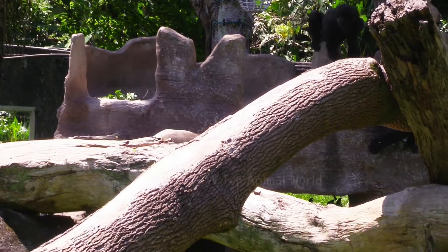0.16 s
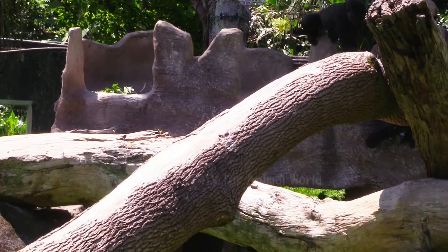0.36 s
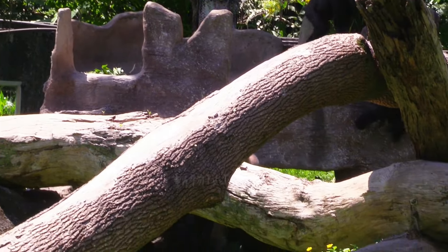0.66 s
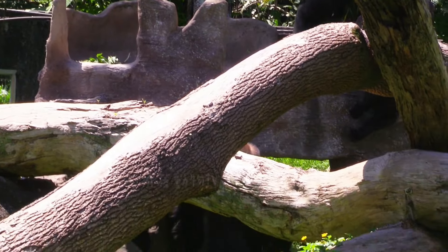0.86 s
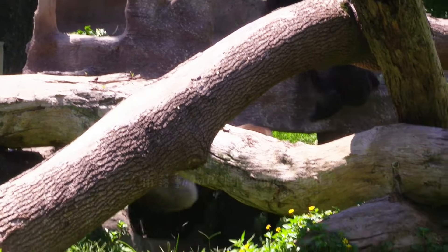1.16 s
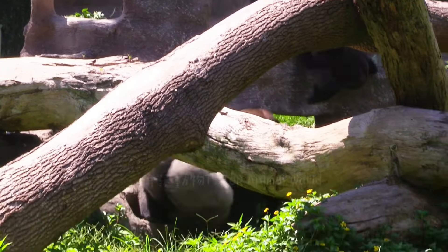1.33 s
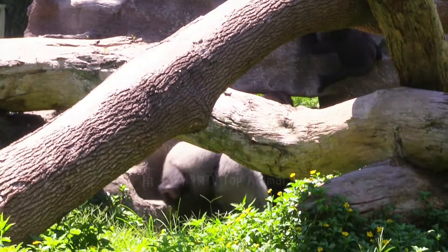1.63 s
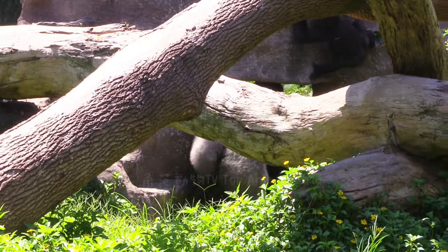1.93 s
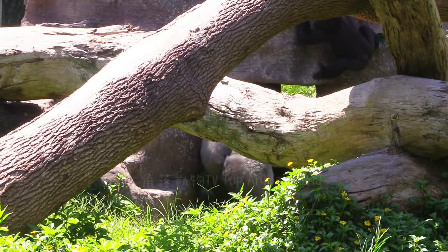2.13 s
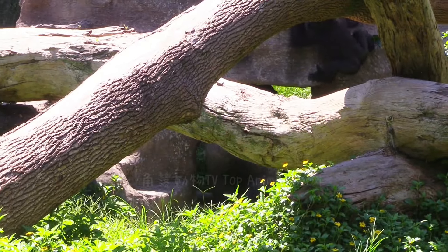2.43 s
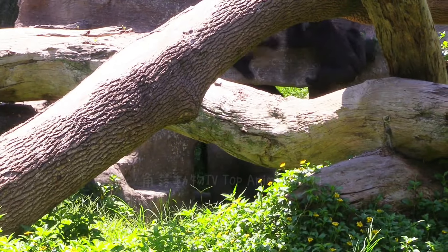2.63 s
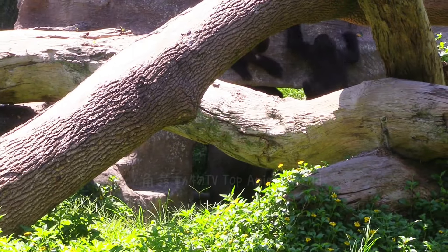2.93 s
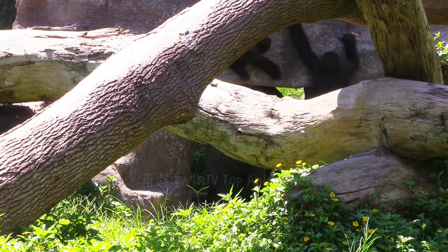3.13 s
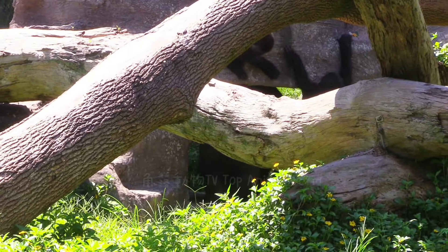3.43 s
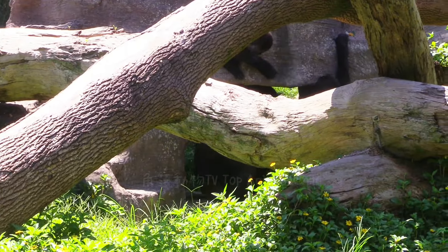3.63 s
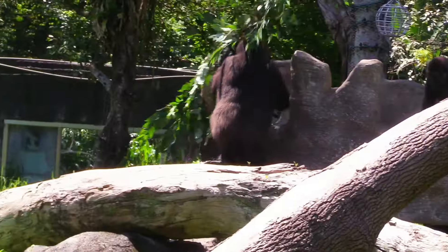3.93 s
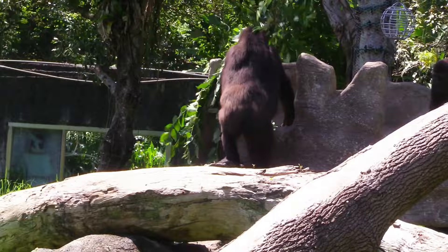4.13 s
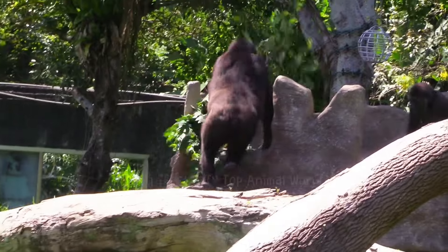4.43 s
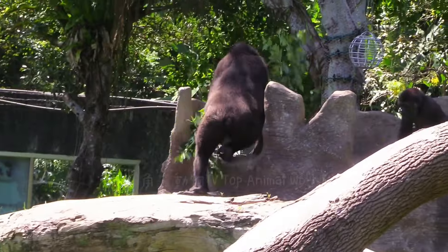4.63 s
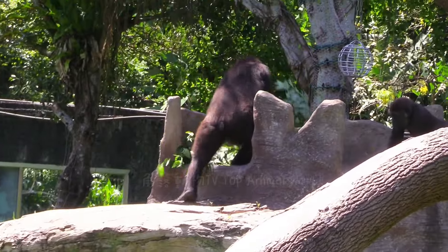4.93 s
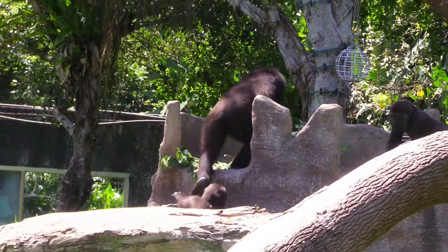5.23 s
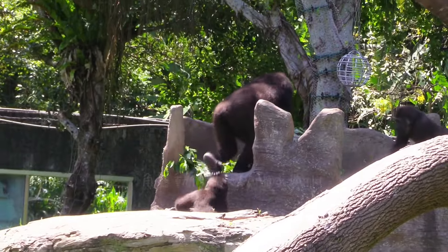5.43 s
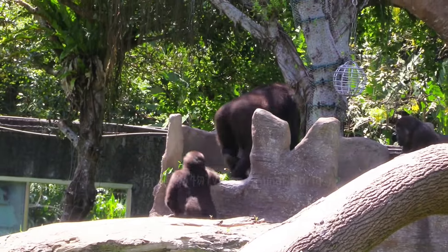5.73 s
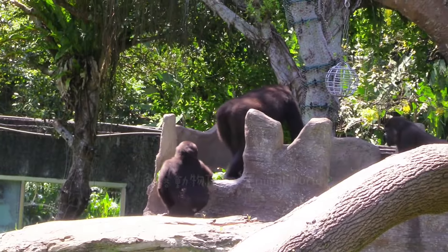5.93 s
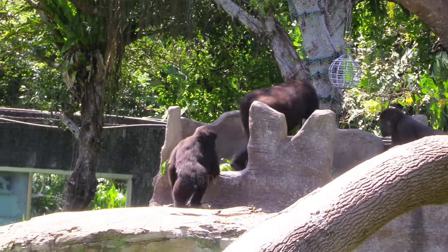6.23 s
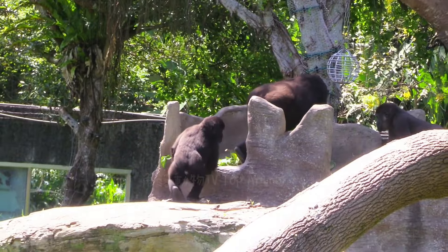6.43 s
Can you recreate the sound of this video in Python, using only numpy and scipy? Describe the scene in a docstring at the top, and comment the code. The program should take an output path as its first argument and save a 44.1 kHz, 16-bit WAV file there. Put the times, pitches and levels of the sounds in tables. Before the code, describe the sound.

Steady, quiet distant town noise and a low hum lie under birdsong outdoors. A close bird swells through rapid high loops, slurs and warbles, ending in a buzzing flourish, as a more distant bird chatters a fast even trill near the centre. A long lull holds barely audible tree chirps, then the trill returns more softly, followed by a rising sweep and two last chips. Stereo pickup with short, diffuse echoes from leaves, rocks and trees.

```python
"""Songbirds in trees round a rock-walled enclosure, over distant town noise and a steady machine hum.
After three faint falling calls comes a thin whistle; a near bird sings quick looping notes while another
bird, farther off, trills. The near bird goes on to lower phrases and a buzzy flourish; calls from deep in
the trees follow, and late on the other bird trills again, a bit softer. Birds are gliding, buzzing tones,
scattered into short tails by random echoes; the town noise is shaped noise, the hum a wavering sine."""
import sys
import numpy as np
from scipy import signal
from scipy.fft import rfft, irfft
from scipy.io import wavfile

SR = 44100
rng = np.random.default_rng(int(sys.argv[2]) if len(sys.argv) > 2 else 0)


def file_out(sig):
    """Save sig as 16-bit WAV at sys.argv[1]."""
    # one column per channel
    cols = np.atleast_2d(sig).T
    # limit, then scale
    lim = np.clip(cols, -1, 1)
    pcm = np.round(lim * 32767).astype(np.int16)
    wavfile.write(sys.argv[1], SR, pcm)


N = 289737


# near bird, single syllables: [t/s, syllable, level/dB]
NEAR_NOTES = [(.400, "loop", -41), (.520, "loop", -37.5), (.637, "loop", -31.5), (1.151, "thin", -43.5),
              (1.189, "slur", -32.5), (1.244, "thin", -43), (1.246, "scoop", -27.5), (1.345, "fall", -21.5),
              (1.364, "thin", -38.5), (1.492, "seep", -35.5), (2.258, "flourish", -21)]
# near bird, runs: [start t/s, syllable, count, first level/dB, last level/dB]
NEAR_REPEATS = [(.751, "loop", 4, -28.5, -21), (1.530, "warble", 4, -22, -21)]


def near_bird():
    """Off to the left, so its direct sound reaches the right side later."""
    voice = song(NEAR_NOTES + repeats(NEAR_REPEATS), jitter=.008, flutter_db=2, octave_db=-53)
    direct = amp(-1) * np.array([voice, delayed(voice, ms=.335)])
    return direct + scatter(voice, leaves_db=-7, rocks_db=-7, trees_db=-4.8)


# trilling bird, single syllables ("rise" is a plunge: a faint, steep downward glide):
# [t/s, syllable, level/dB]
TRILL_NOTES = [(.365, "whistle", -44.5), (1.352, "chip", -29), (2.61, "rise", -58),
               (5.232, "whistle", -49.5), (5.411, "low", -48.5), (6.150, "sweep", -35),
               (6.421, "lift", -38.5)]
# trilling bird, runs: [start t/s, syllable, count, first level/dB, last level/dB]
TRILL_REPEATS = [(.592, "chip", 8, -32.5, -28.5), (5.455, "chip", 8, -33.5, -30.5),
                 (6.448, "chip", 2, -32, -38)]


def trilling_bird():
    """Farther off and almost straight ahead: the echoes outweigh the direct sound."""
    voice = song(TRILL_NOTES + repeats(TRILL_REPEATS), jitter=.009, flutter_db=2, octave_db=-38)
    direct = amp(-3) * np.array([delayed(voice, ms=.05), voice])
    return direct + scatter(voice, leaves_db=-2, rocks_db=-2.5, trees_db=0)


# calls from birds deep in the trees, single syllables: [t/s, syllable, level/dB]
ECHOED_NOTES = [(2.11, "tsip", -64), (2.212, "zip", -45.5), (2.50, "tsip", -72.5), (2.622, "tsip", -60.5),
                (2.885, "whit", -64.5), (3.0, "tsip", -79), (3.232, "tsip", -57.5), (3.76, "seep", -69),
                (3.83, "tsip", -71.5), (3.92, "seep", -74.5), (4.48, "seep", -81), (5.05, "dip", -55),
                (5.265, "whit", -48), (5.285, "dip", -52), (5.335, "whit", -50), (5.43, "wisp", -62),
                (5.97, "dip", -50), (6.375, "dip", -44.5)]
# the near bird's faint opening calls (first row), then calls from birds deep in the trees, runs: # [start t/s,
# syllable, count, first level/dB, last level/dB]
ECHOED_REPEATS = [(.08, "dip", 3, -54, -48), (1.15, "zip", 4, -52.5, -42), (3.565, "whit", 4, -74, -65.5),
                  (3.925, "whit", 5, -64, -70), (4.72, "dip", 5, -70, -51)]


def echoed_calls():
    """The near bird's faint opening calls, and calls from birds deep in the trees, heard only as echoes."""
    voice = song(ECHOED_NOTES + repeats(ECHOED_REPEATS), jitter=0.025, flutter_db=5.5, octave_db=-44)
    return scatter(voice, leaves_db=-3, rocks_db=-2, trees_db=0)


# pace of each run syllable: {syllable: onset to onset/s}
RUN_PACE_S = {"loop": .1092, "warble": .166, "chip": .0742, "dip": .107, "zip": .11, "whit": .091}


def repeats(runs):
    """Spell runs out as single syllables at a fixed pace, swelling or fading evenly in dB."""
    notes = []
    for start_s, name, count, first_db, last_db in runs:
        for k, db in enumerate(np.linspace(first_db, last_db, round(count))):
            notes.append((start_s + k * RUN_PACE_S[name], name, db))
    return notes


BUZZ_HZ = 55.5
RAMP_POWER = 1.41  # above 1: hollow ramps, more pointed notes
PITCH_SPREAD, LEVEL_SPREAD_DB = .012, 0.47  # rms, glide to glide; pitch as a share
# glides of the syrinx, one to five per syllable ("rise" is a plunge, steeply downward):
# {syllable: [delay/s, length/s, start f/Hz, middle f/Hz, end f/Hz, level re note/dB, attack/s, release/s,
# buzz depth/share of pitch]}
SYLLABLE_GLIDES = { "loop": [(.002, 0.018, 6500, 4850, 4210, 3.5, 0.0093, 0.0084, 0.019),
                   (.037, 0.017, 4800, 5493, 5700, 0, 0.011, 0.0079, 0.0067)],
                   "thin": [(0, 0.028, 6100, 6920, 7050, 1, 0.0086, 0.013, .01)],
                   "slur": [(0.0018, 0.036, 5100, 4100, 4300, 3, .004, 0.013, .025)],
                   "scoop": [(0, .024, 3164, 3117, 2450, -8, 0.0056, 0.0018, .03),
                   (.022, 0.054, 3590, 3674, 3720, -1.5, 0.0038, 0.044, 0.037),
                   (.069, .022, 3660, 2850, 2750, 0, 0.0046, 0.022, .02)],
                   "fall": [(0, .045, 3880, 4580, 4900, -1, 0.022, 0.02, .1),
                   (.052, 0.034, 4520, 4010, 2910, 1, 0.009, 0.019, .04),
                   (.075, .05, 3100, 2750, 2230, -11.5, 0.0045, 0.022, 0.07)],
                   "seep": [(0.0034, .105, 6700, 6600, 6520, -1.5, 0.018, 0.029, 0.0076)],
                   "warble": [(0, 0.013, 4020, 4335, 4500, -2.5, .005, 0.0085, 0.025),
                   (.018, 0.0273, 3320, 2815, 2410, -2.5, 0.0076, .022, .012),
                   (.055, .026, 1800, 2647, 3790, 2, 0.028, .003, 0.036),
                   (.076, 0.016, 3500, 3854, 4470, 1.5, 0.0055, 0.0096, 0.036),
                   (.087, .027, 3400, 2550, 1926, -9.5, 0.0033, .006, .05)],
                   "flourish": [(0, .04, 2770, 3150, 3840, -11.5, 0.014, 0.0038, 0.044),
                   (.027, .057, 3510, 4370, 3510, 0.5, 0.013, 0.051, 0.1),
                   (.076, .13, 3176, 2537, 2423, -9, .015, 0.055, 0.14)],
                   "whistle": [(0, 0.31, 3250, 3620, 3400, -3.5, 0.015, .04, 0.031)],
                   "low": [(0, 0.131, 2400, 2520, 2300, -2, 0.0067, 0.023, 0.0037)],
                   "chip": [(.004, .016, 4650, 4123, 3200, -9, 0.0061, 0.0046, 0.031),
                   (.014, .025, 3580, 2947, 2090, 0.5, 0.0074, 0.027, 0.018)],
                   "sweep": [(0, .045, 3390, 3067, 2490, -3, 0.02, 0.01, .025),
                   (.066, .108, 2860, 4306, 4480, -4, 0.0062, 0.023, 0.012)],
                   "lift": [(0.00073, 0.036, 2750, 3100, 3020, -4, 0.0045, 0.013, 0.0086)],
                   "whit": [(0, 0.052, 3100, 3750, 4700, -1, 0.0064, .012, 0.042)],
                   "rise": [(0.00096, 0.0584, 8100, 3600, 2400, 0, 0.051, 0.024, .008)],
                   "dip": [(0.0029, .05, 5390, 4400, 4020, 3.5, 0.006, 0.049, 0.0825)],
                   "zip": [(0, 0.055, 6700, 5550, 3900, 0, 0.01, 0.0059, 0.11)],
                   "wisp": [(0.0015, 0.16, 1800, 5460, 2100, -2, 0.029, 0.078, 0.014)],
                   "tsip": [(0, 0.031, 7150, 6850, 9200, 7, 0.002, 0.02, 0.012)], }


def song(notes, jitter, flutter_db, octave_db):
    """The syrinx gives a nearly pure tone bending smoothly through each glide; fast vibrato makes it buzz."""
    out, waver, flutter = np.zeros(N), drift(350), drift(410)
    for s, name, db in notes:
        for delay_s, length_s, start_hz, middle_hz, end_hz, glide_db, attack_s, release_s, buzz in \
                SYLLABLE_GLIDES[name]:
            t = np.arange(0, length_s, 1 / SR)
            now = (round((s + delay_s) * SR) + np.arange(len(t))) % N
            bend = np.polyfit([0, .5, 1], [start_hz, middle_hz, end_hz], 2)
            sharp, louder = rng.standard_normal(2)
            vibrato = buzz * np.cos(2 * np.pi * BUZZ_HZ * t)
            detune = 1 + PITCH_SPREAD * sharp + vibrato + jitter * waver[now]
            hz = np.polyval(bend, t / length_s) * detune
            phase = 2 * np.pi * np.cumsum(hz) / SR
            ramps = np.minimum(t / attack_s, (length_s - t) / release_s)
            envelope = np.clip(ramps, 0, 1) ** RAMP_POWER
            level_db = db + glide_db + LEVEL_SPREAD_DB * louder + flutter_db * flutter[now]
            tone = np.sin(phase) + amp(octave_db) * np.sin(2 * phase)
            add(out, s + delay_s, envelope * amp(level_db) * tone)
    return out


LEAVES_T60_S, ROCK_T60_S = .06, 0.23
ROCK_HZ = 4940  # rock echoes fade above this
# decay of the far trees' echoes: [f/Hz, t60/s]
TREE_T60 = [(2000, 0.38), (3500, 0.62), (5000, 0.43), (7000, 0.51)]


def scatter(x, leaves_db, rocks_db, trees_db):
    """Leaves round the perch blur each note, rocks add a dull echo cluster, far trees a longer tail."""
    t = np.arange(SR) / SR
    density = np.reshape([.1, .02, .1], (3, 1, 1))  # echoes per sample
    signs = rng.choice([-1, 1], (3, 2, SR))
    leaves, rocks, trees = signs * (rng.random((3, 2, SR)) < density)
    leaves = leaves * amp(-60 * t / LEAVES_T60_S) * (t > .001)
    rocks = rocks * amp(-60 * t / ROCK_T60_S) * (t > .008)
    trees = trees * (1 - np.exp(-t / 0.011))  # gradual onset
    hz, when, z = signal.stft(trees, SR, nperseg=256)
    decay = amp(-60 * when / read(TREE_T60, hz)[:, None])
    trees = signal.istft(z * decay, SR, nperseg=256)[1][:, :SR]
    leaves, rocks, trees = (h / np.linalg.norm(h, axis=1, keepdims=True) for h in (leaves, rocks, trees))
    rocks = signal.lfilter(*signal.butter(3, ROCK_HZ, fs=SR), rocks)
    echoes = amp(leaves_db) * leaves + amp(rocks_db) * rocks + amp(trees_db) * trees
    return signal.fftconvolve(x[None], echoes, axes=1)[:, :N]


SWELL_DB = 1.0  # rms
# town noise spectrum, shape only: [f/Hz, relative level/dB per Hz]
AIR_SPECTRUM = [(18, -4), (38, -9), (68, 1.5), (105, -3.5), (205, -7.5), (270, -12), (700, -14.5),
                (1030, -14.5), (1400, -19.5), (1800, -27), (2500, -33.5), (5000, -36.5), (9000, -47),
                (15500, -43)]
# town noise level, 150-1400 Hz, before swells: [t/s, level/dB]
AIR_LEVEL = [(0.3, -53.5), (0.8, -52.5), (6.33, -54.5), (6.5, -53.5)]
# left-right likeness of the town noise: [f/Hz, correlation]
AIR_LIKENESS = [(60, 0.96), (130, 0.91), (290, 0.69), (640, 0.52), (1410, -0.016), (3100, -0.012),
                (6820, 0.097), (15000, -0.043)]


def air():
    """Distant town noise: the rumble is alike on both sides, the hiss above it diffuse."""
    hz = np.fft.rfftfreq(N, 1 / SR)
    left, other = rfft(rng.standard_normal((2, N)))
    same = np.clip(read(AIR_LIKENESS, hz), -1, 1)
    right = same * left + np.sqrt(1 - same ** 2) * other
    z = np.array([left, right]) * amp(read(AIR_SPECTRUM, hz))
    body_rms = irfft(z.mean(0) * (hz > 150) * (hz < 1400), N).std()
    level_db = np.interp(np.arange(N) / SR, *np.transpose(AIR_LEVEL))
    return irfft(z, N) / body_rms * amp(level_db + SWELL_DB * drift(3.2))


HUM_HZ, HUM_DB = 79.5, -60.5  # mean pitch, rms level


def hum():
    """A low machine hum: a sine that wavers in pitch and strength."""
    hz = HUM_HZ * (1 + 0.019 * drift(5.2))
    phase = 2 * np.pi * np.cumsum(hz) / SR
    return amp(HUM_DB) * evened(np.sin(phase) * amp(1.9 * drift(1.3)))


def amp(db):
    """dB to amplitude ratio."""
    return 10 ** (np.asarray(db) / 20)


def evened(x):
    """Scale to rms 1."""
    return x / np.sqrt(np.mean(x ** 2) + 1e-20)


def read(points, hz):
    """Interpolate a [f/Hz, value] table on a log frequency scale."""
    f, value = np.transpose(points)
    return np.interp(np.log(hz + 1), np.log(f + 1), value)


def add(mix, s, sound):
    """Add sound into mix from s seconds, cut at the end."""
    part = mix[max(round(s * SR), 0):][:len(sound)]
    part += sound[:len(part)]


def drift(hz):
    """Random wander of rms 1: noise with a Gaussian roll-off, up to about hz."""
    rolloff = np.exp(-(np.fft.rfftfreq(N, 1 / SR) / hz) ** 2)
    return evened(irfft(rfft(rng.standard_normal(N)) * rolloff, N))


def delayed(x, ms):
    """Delay by a fraction of a sample or more, as a phase slope."""
    slope = np.exp(-2j * np.pi * np.fft.rfftfreq(N, 1 / SR) * ms / 1000)
    return irfft(rfft(x) * slope, N)


def scene():
    """Sum of all sources, left and right."""
    return near_bird() + trilling_bird() + echoed_calls() + air() + hum()


EDGE_HZ = 15800


def record(dry):
    """The right microphone is a little more sensitive; then a low-pass sets the band limit."""
    sides = dry * amp([[-.8], [.8]])
    band = signal.firwin(511, EDGE_HZ, window=("kaiser", 9), fs=SR)
    return signal.oaconvolve(sides, band[None], "same")


dry = scene()
out = record(dry)
file_out(out)
```